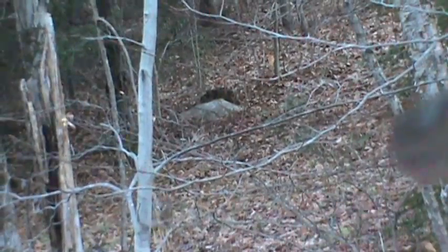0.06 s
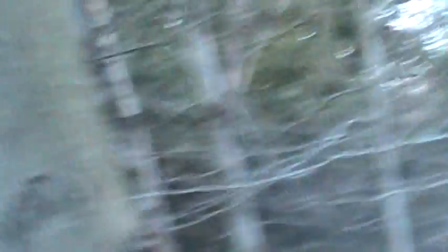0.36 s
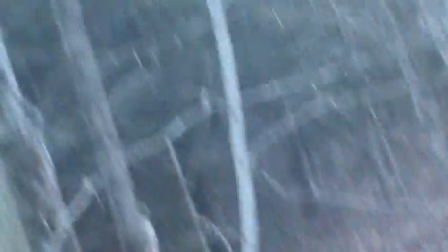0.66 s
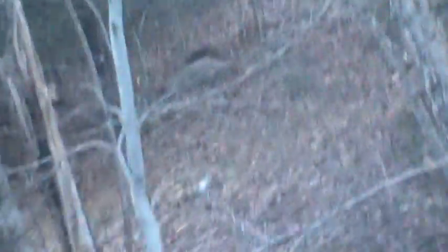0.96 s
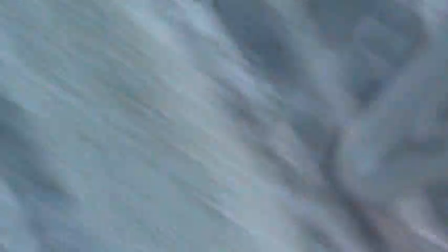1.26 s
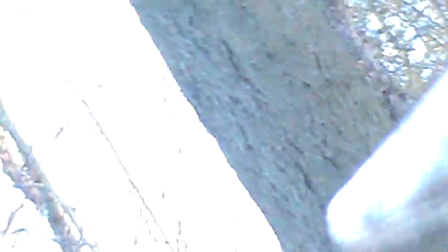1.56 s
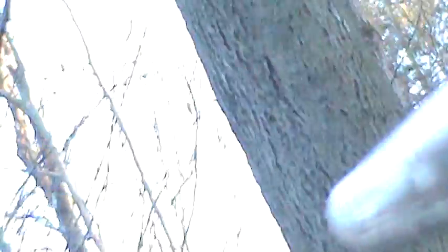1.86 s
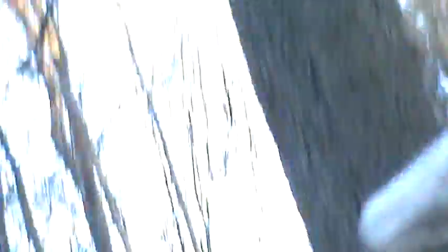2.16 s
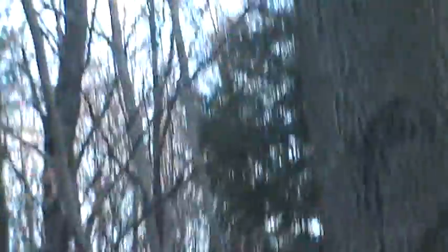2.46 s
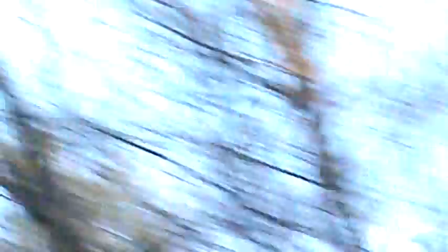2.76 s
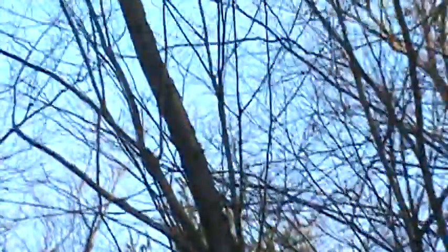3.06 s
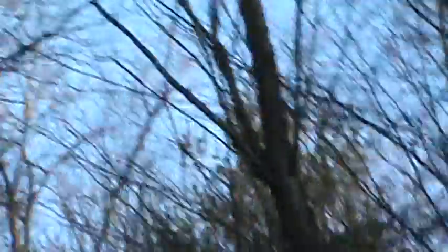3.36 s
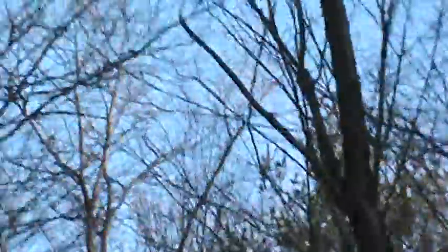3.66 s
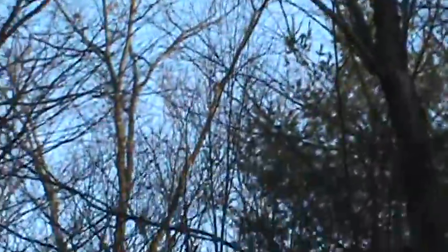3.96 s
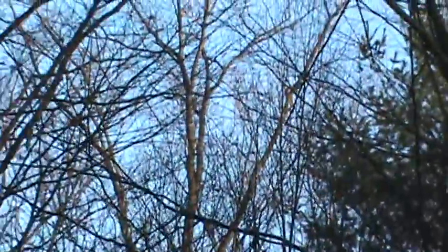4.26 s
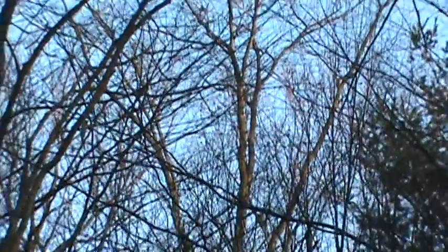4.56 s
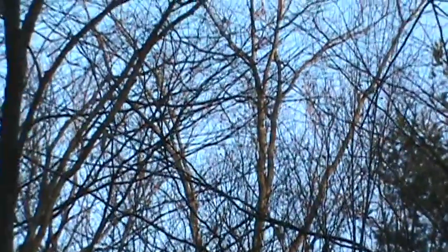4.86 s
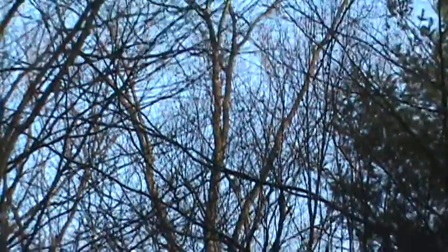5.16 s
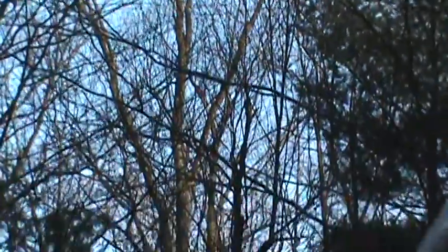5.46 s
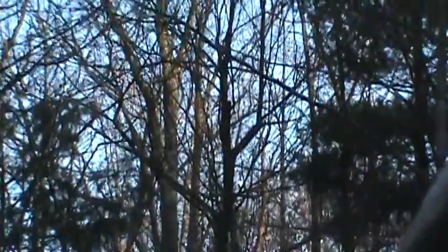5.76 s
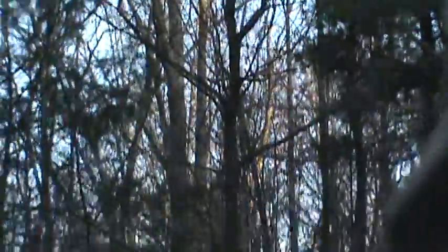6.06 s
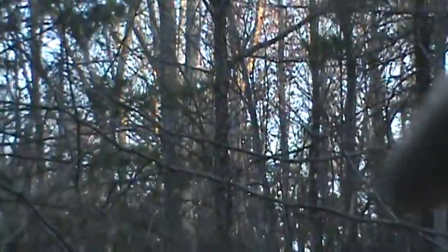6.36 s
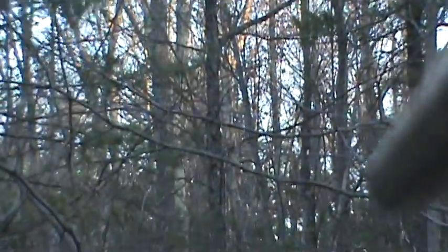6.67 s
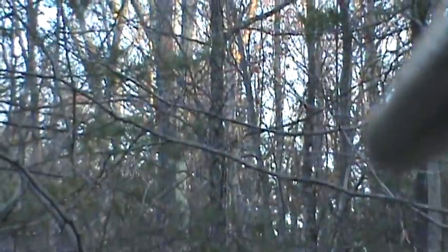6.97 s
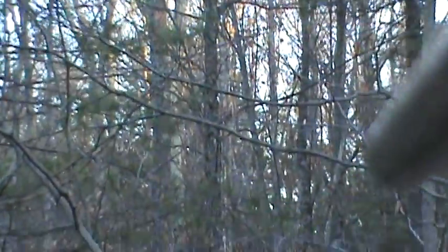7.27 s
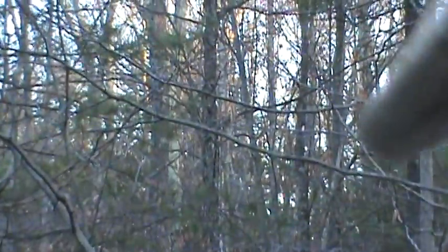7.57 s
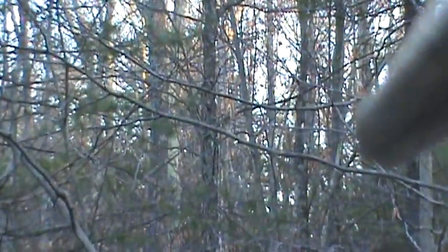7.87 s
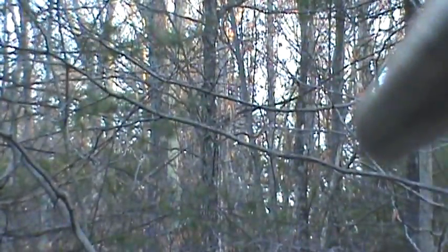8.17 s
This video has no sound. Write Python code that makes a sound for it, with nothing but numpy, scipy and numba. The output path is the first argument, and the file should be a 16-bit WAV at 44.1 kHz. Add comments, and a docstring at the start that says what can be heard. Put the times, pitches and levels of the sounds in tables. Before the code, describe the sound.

In quiet woodland, one close gunshot cracks out at the very start, slightly distorted, and the trees throw back a long, darkening echo. As it dies away, the camera is handled right at the microphone: irregular snaps of its plastic case, rubbing with a low rumble, then light taps. Only a faint outdoor murmur and hiss remain at the end.

```python
"""A tiny tick from a rifle's action, then one loud shot beside a camera in bare woodland.
The blast overloads the microphone, nearby leaves and trunks throw it back, and the echo rolls away,
ever duller, while a limiter (an automatic volume control) lets the level back up. Then hands shift on
the camera: its plastic case snaps, knocks and rubs over a quiet forest and a faint hiss."""
import sys
import numpy as np
from scipy import signal
from scipy.fft import rfft, irfft
from scipy.io import wavfile
from scipy.ndimage import uniform_filter1d
from numba import njit

SR = 44100
rng = np.random.default_rng(int(sys.argv[2]) if len(sys.argv) > 2 else 0)


def persist_wave(psi):
    """Save psi, clipped to +-1, as 16-bit WAV."""
    counts = np.round(np.clip(psi, -1, 1) * 32767).astype(np.int16)
    wavfile.write(sys.argv[1], SR, np.atleast_2d(counts).T)


N = 362898
TIME = np.arange(N) / SR
SHOT_S = .1168


def undb(db):
    """Turn decibels into a plain multiplier."""
    return 10 ** (np.asarray(db) / 20)


def unit(x):
    """Scale a signal to an average (rms) level of 1."""
    return x / np.sqrt(np.mean(x ** 2) + 1e-30)


def swell(rows, start):
    """Loudness curve through (t/s, level/dB) points counted from start, silent outside them."""
    s, db = np.transpose(rows)
    return undb(np.interp(TIME - start, s, db, left=-200, right=-200))


def gesture(start, hold, db, rise_db_per_s, fade_db_per_s):
    """Power of a sound that rises until start, holds and then fades."""
    drop_db = np.maximum(rise_db_per_s * (start - TIME), fade_db_per_s * (TIME - start - hold))
    return 10 ** ((db - np.clip(drop_db, 0, 120)) / 10)


def flicker(depth_db, smooth_samples, size=N):
    """A loudness that wobbles at random; more smoothing makes it slower."""
    return undb(depth_db * unit(uniform_filter1d(rng.standard_normal(size), smooth_samples)))


def colour(rows, hz):
    """How strong each frequency is, read from (f/Hz, level/dB) points."""
    at, db = np.transpose(rows)
    return undb(np.interp(np.log(hz + 1), np.log(at), db))


def noise(side_db, size=N):
    """Stereo white noise: a part both channels share (mid) and a weaker opposed part (side)."""
    mid, side = rng.standard_normal((2, size))
    return unit(mid + undb(side_db) * side * np.array([[1], [-1]]))


def tinted(rows, side_db, bass_side_db=-9, bass_hz=35, wide_hz=110):
    """Stereo noise with a given tone colour; the bass has its own stereo width."""
    hz = np.fft.rfftfreq(N, 1 / SR)
    mid, side = rfft(rng.standard_normal((2, N)))
    side = side * colour([(bass_hz, bass_side_db), (wide_hz, side_db)], hz)
    return unit(irfft(np.array([mid + side, mid - side]) * colour(rows, hz), N))


def resonance(hz, centre, width):
    """How strongly one ringing tone answers each frequency: 1 at its centre."""
    return hz * width / (hz * width + 1j * (hz ** 2 - centre ** 2))


def hit_level(x, db):
    """Give each channel of a short sound the energy of 10 ms at this level."""
    return x * undb(db) / np.sqrt(np.sum(x ** 2, axis=-1, keepdims=True) / (.01 * SR))


def add(out, s, sound, pan_db=0):
    """Mix a short sound in at time s; pan_db is left minus right."""
    i = int(s * SR)
    out[:, i:i + sound.shape[-1]] += (sound * undb(np.array([[pan_db], [-pan_db]]) / 2))[:, :N - i]


# tone colour of the quiet forest and the microphone's hiss: f/Hz, level/dB
FOREST_COLOUR = [(20, -23.5), (50, -9), (110, -5), (330, -3), (480, -7), (800, -10.5), (1300, -19.5),
                 (2200, -24.5), (5000, -27.5), (15500, -29.5)]
# the camera's faint high tones: f/Hz, level/dB
WHINE_TONES = [(6218, -80.5), (15735, -74.5)]
def background(forest_db=-51):
    """The woods murmur far away, with a little hiss and the camera's thin whine."""
    whine = sum(undb(db) * np.sqrt(2) * np.sin(2 * np.pi * hz * TIME) for hz, db in WHINE_TONES)
    forest = tinted(FOREST_COLOUR, side_db=-3.5, bass_side_db=-22, bass_hz=250, wide_hz=900)
    return forest * undb(forest_db) + whine


# the tones at which the camera case rings: f/Hz, width/Hz, level/dB
CASE_TONES = [(560, 220, -1), (740, 150, 1.5), (942, 95, 4), (1290, 280, -3.5), (1995, 430, -3.5),
              (3163, 160, -4.5), (3780, 670, -6), (5640, 480, -11.5), (6204, 690, -6), (8400, 900, -18.5),
              (9240, 2100, -18.5), (10100, 1200, -22), (10800, 300, -18)]
def case(push, stretch=1, airborne_db=-8):
    """The plastic case rings, retuned a little by the grip; some sound comes straight through the air."""
    hz = np.fft.rfftfreq(push.shape[-1], 1 / SR)
    response = sum(undb(db) * resonance(hz, f * stretch, width) for f, width, db in CASE_TONES)
    return irfft(rfft(push) * (response + undb(airborne_db)), push.shape[-1])


# moves of the hand on the camera: t/s, length/s, scrape level/dB, rumble level/dB
HAND_MOVES = [(1.154, 0.042, -66, -38.5), (1.248, 0.076, -33, -61), (1.48, 0.93, -49.5, -70),
              (2.201, 0.082, -33.5, -52), (2.285, 0.26, -39, -52), (2.622, 0.026, -35.5, -52),
              (2.69, 0.41, -47.5, -46.5), (2.8, 0.089, -37, -40.5), (3.312, 0.24, -38.5, -39.5),
              (3.413, 0.067, -29.5, -32.5), (3.722, 0.066, -54, -44), (3.943, 0.055, -45, -47),
              (5.707, 0.62, -62, -75), (5.989, 0.073, -46, -57.5), (6.546, 1, -71, -75),
              (7.05, .05, -70, -51.5), (7.687, 0.021, -72, -56)]
def hand_motion():
    """How loudly the hand scrapes, and how loudly the camera body rumbles, at each moment."""
    scrape_power = sum(gesture(s, length, db, 548, 518) for s, length, db, _ in HAND_MOVES)
    rumble_power = sum(gesture(s, length, db, 178, 144) for s, length, _, db in HAND_MOVES)
    return np.sqrt(scrape_power), np.sqrt(rumble_power)


# tone colours of the scrape and of the grip's rumble: f/Hz, level/dB
SCRAPE_COLOUR = [(150, -10), (300, -8), (700, 13), (1400, 1.5), (2300, 5.5), (4000, 3.5), (6000, -3),
                 (10000, -2.5), (12500, -9.5), (15500, -21)]
RUMBLE_COLOUR = [(20, -9), (50, -5), (90, 5), (135, 6), (250, 0), (450, -7), (700, -3.5), (1000, -10.5),
                 (2500, -55)]
def rubbing(scrape_gain, rumble_gain, case_db=-5, catches_per_s=75, catch_s=0.0011):
    """Skin and cloth scrape in jerks and set the case ringing; the moving grip rumbles below."""
    grains, jerks = flicker(3, 24), flicker(2, 300)
    # now and then a fibre catches, lets go at once and quickly settles
    slips = (rng.random(N) < catches_per_s / SR) * rng.random(N) ** 2 * 2
    catches = undb(12) * signal.lfilter([1], [1, -np.exp(-1 / (catch_s * SR))], slips)
    hiss = tinted(SCRAPE_COLOUR, side_db=-2.5, bass_side_db=-1, bass_hz=1500, wide_hz=8000)
    scrape = unit(hiss * (grains * jerks + catches))
    friction = unit(scrape + undb(case_db) * unit(case(scrape)))
    rumble = tinted(RUMBLE_COLOUR, side_db=-1.5, bass_side_db=-14.5, bass_hz=140, wide_hz=500)
    return friction * scrape_gain + rumble * rumble_gain


# soft finger knocks on the case: t/s, ring level/dB, f/Hz, tick level compared with the ring/dB
FINGER_KNOCKS = [(3.817, -33, 910, -11), (4.2561, -44.5, 815, -5.5), (4.3627, -44.5, 826, -0.5),
                 (4.537, -44.5, 870, 2.5), (5.6583, -39.5, 800, 0), (5.696, -37.5, 800, -6.5),
                 (5.7366, -36, 790, -5), (5.8649, -38.5, 738, -19), (5.9686, -38, 760, -14),
                 (5.9985, -34.5, 774, -8), (6.103, -41.5, 720, -4), (6.2418, -43, 637, -20),
                 (6.572, -42.5, 740, -9), (6.642, -41, 665, -9.5), (6.7327, -40, 720, -14),
                 (6.8003, -49.5, 700, 1), (6.8414, -42, 660, -22), (7.0796, -39, 696, -11),
                 (7.1202, -31.5, 686, -20), (7.1626, -36, 690, -11), (7.7043, -56, 660, -2)]
def knocks(rise_s=0.00087, ring_s=0.0023, right_lag_s=0.00036, fingertip_hz=3000):
    """A fingertip pushes slowly, so mostly one low tone rings; it reaches the left channel first."""
    out = np.zeros((2, N))
    t = np.maximum(TIME[:2048] - np.array([[0], [right_lag_s]]), 0)
    shape = (1 - np.exp(-t / rise_s)) ** 2 * np.exp(-t / ring_s)
    soften = signal.butter(1, fingertip_hz, fs=SR, output="sos")
    for s, db, hz, tick_db in FINGER_KNOCKS:
        ring = shape * np.sin(2 * np.pi * hz * t)
        tick = signal.sosfilt(soften, case(noise(-2.5, size=2048) * shape))
        add(out, s, hit_level(ring, db) + hit_level(tick, db + tick_db))
    return out


# clicks that set a small hard part ringing: t/s, level/dB, f/Hz
LOOSE_PART_PINGS = [(1.5327, -32.5, 4080), (6.016, -34.5, 3600), (7.1515, -32.5, 3720)]
def pings(ring_s=0.0017, right_lag_s=.00005, split=0.1):
    """A small loose part of the case rings briefly with two tones close together."""
    out = np.zeros((2, N))
    t = np.maximum(TIME[:2048] - np.array([[0], [right_lag_s]]), 0)
    for s, db, hz in LOOSE_PART_PINGS:
        phase = 2 * np.pi * hz * t
        pair = np.sin(phase * (1 + split / 2)) - np.sin(phase * (1 - split / 2))
        add(out, s, hit_level(pair * np.exp(-t / ring_s), db))
    return out


def creaks(scrape_gain, growth=.62, scatter_db=3, tilt_db=4, tries=120):
    """The case gives faint clicks at random times, louder when the hand scrapes harder."""
    rows = []
    for s, (strength, tilt) in zip(rng.random(tries) * TIME[-1], rng.standard_normal((tries, 2))):
        scrape_db = 20 * np.log10(scrape_gain[int(s * SR)])
        db = -20 + growth * scrape_db + scatter_db * strength
        if db > -66:  # skip the faintest
            rows.append((s, db, -3 - tilt_db * tilt, -2 + tilt_db * tilt))
    return snaps(rows)


# sharp clicks, first of the rifle's action, then of the camera case:
# t/s, middle band level/dB, low band compared with it/dB, top band compared with it/dB
SHARP_CLICKS = [(.0924, -47, -29, 3), (.096, -54, -25, 1), (.6306, -37.5, -3, 7), (.7439, -17.5, -9, -4),
                (.7816, -19.5, -4, -8), (1.0661, -33.5, -9, -3), (1.1151, -31, -13, -4),
                (1.138, -29.5, 8, -13), (1.1624, -27.5, -15, -6.5), (1.1701, -28.5, -3, -5),
                (1.1806, -27.5, -15, -12), (1.2268, -35.5, -6, -1.5), (1.2878, -26.5, -6.5, -4.5),
                (1.3202, -26, -8, -4), (1.3321, -35, -4.5, -2.5), (1.4049, -37.5, -7, -12),
                (1.5327, -27, -9, -11), (1.6143, -32.5, -7, -8), (1.6726, -27.5, -3, -7),
                (1.768, -29, -3.5, -3), (1.8996, -28, -3.5, 1), (1.9587, -36.5, -8, -5),
                (2.0028, -28.5, -1.5, -3.5), (2.0444, -36.5, -7, -6), (2.0745, -37, 3, -8),
                (2.2027, -24, -2.5, -1.5), (2.2442, -44, 1, 15), (2.2674, -30, -12, 0),
                (2.3817, -37, 3, -3), (2.5178, -41, -7, -1), (2.8098, -23.5, -14, -14),
                (2.8141, -26.5, -3, -6), (2.8407, -32.5, -2, -2), (2.9858, -40.5, 1, 1),
                (3.0392, -34, -3, -5), (3.0708, -31.5, -3.5, -6), (3.1418, -37, 1, -4.5),
                (3.2674, -28.5, -7, -9), (3.3092, -27, -7.5, -8), (3.4912, -23, -7, -8.5),
                (3.6183, -37, 7, -12), (3.6224, -25.5, -0.5, -7), (3.7345, -42, 2, -8),
                (3.7406, -27, 0.5, -8.5), (3.7926, -33, 6.5, -9), (3.951, -25, -0.5, -2.5),
                (3.971, -35, -9.5, -7), (3.9982, -36, -4, 5), (4.0065, -27.5, 2, -10),
                (4.0288, -35.5, 2, 0.5), (4.449, -56.5, -8, 3), (4.576, -29, 3.5, -1),
                (4.6065, -33.5, 4.5, -11), (5.0893, -24.5, -0.5, -2), (5.3417, -40.5, -9, -7),
                (5.3876, -22.5, 0.5, -1.5), (5.4355, -37.5, 4.5, -7), (5.6109, -34, -2.5, -3),
                (5.6269, -33.5, 7, -1), (5.793, -40.5, 1, -4), (5.8729, -44.5, -16, -5.5),
                (6.0156, -37.5, -1, 1), (6.1324, -44, 1.5, -5), (6.2702, -55, 5, 0),
                (6.897, -65, -12.5, 17), (7.1515, -39.5, -14, 6)]
def snaps(rows, rise_s=0.0011, slip_s=0.0017, rattle_s=0.012, spot_hz=3400):
    """Each click is a brief slip of two hard surfaces and a weak rattle, heard through the case."""
    out, t = np.zeros((2, N)), TIME[:2048]
    hz = np.fft.rfftfreq(len(t), 1 / SR)
    rattle = undb(-19) * np.exp(-t / rattle_s)
    contact = np.minimum(t / rise_s, 1) ** 2 * (np.exp(-np.maximum(t - rise_s, 0) / slip_s) + rattle)
    bands = [signal.butter(2, edges_hz, "band", fs=SR, output="sos")
             for edges_hz in ((320, 1360), (1900, 5900), (6800, 12300))]
    for s, db, low_db, top_db in rows:
        grip, place, across = rng.standard_normal(3)
        # the surfaces catch and let go several times within one click
        slip = contact * flicker(4, 30, len(t))
        # each touched spot rings at a slightly different pitch
        spot = 1 + undb(1) * resonance(hz, spot_hz * np.exp(0.13 * place), width=800)
        for band, share_db, side_db in zip(bands, (low_db, 0, top_db), (-2.5, -2.5, -6)):
            ring = case(noise(side_db, len(t)) * slip, stretch=1 + 0.05 * grip)
            click = signal.sosfilt(band, irfft(rfft(ring) * spot))
            add(out, s, hit_level(click, db + share_db), pan_db=-1 + 1.65 * across)
    return out


def travel_loss_db(hz, travel_s, air_db_per_s_hz=0.0066, brush_db_per_s=7.9, brush_hz=300):
    """Air and undergrowth soak up the treble along the way; the low roll builds up a little late."""
    loss_db_per_s = air_db_per_s_hz * hz + brush_db_per_s * hz ** 2 / (hz ** 2 + brush_hz ** 2)
    late_lows_db = np.outer(1 / (1 + (hz / 600) ** 2), np.exp(-travel_s / .22))
    return np.outer(loss_db_per_s, travel_s) + late_lows_db


# tone colour of the echo before the air dulls it: f/Hz, level/dB
FRESH_ECHO_COLOUR = [(25, -44), (50, -39), (90, -38), (130, -25.5), (190, -7.5), (280, -0.5), (420, 1),
                     (650, 0.5), (1000, -3), (2000, -5), (4000, -10), (8000, -12.5), (15500, -12.5)]
# echoes of close trunks, the facing slope, the woods beyond and the last far roll:
# level/dB, hold/s, fade/(dB per s)
ECHO_LAYERS = [(-4, 0.014, 109), (-6.5, 0.708, 83), (-11.5, .05, 10), (-47, 1, 2)]
def echo(delay_s=.015, rise_db_per_s=3702.5, patchy_db=1.0):
    """Countless trunks return the shot; the longer the path, the more treble the air has taken."""
    hz, s, (mid, side) = signal.stft(rng.standard_normal((2, N)), SR, nperseg=2048)
    travel_s = np.maximum(s - SHOT_S, 0)
    tone = colour(FRESH_ECHO_COLOUR, hz)[:, None] * undb(-travel_loss_db(hz, travel_s))
    tone /= np.sqrt(np.mean(tone ** 2, axis=0))  # keep only the colour: the layers set the loudness
    # stands of trees answer in clumps, each with its own colour
    clumps = uniform_filter1d(rng.standard_normal(tone.shape), size=2, axis=1)
    clumps = uniform_filter1d(clumps, size=10, axis=0)
    tone *= undb(patchy_db * unit(clumps))
    # high sounds differ more between left and right
    width = colour([(200, -11), (2000, -6)], hz)[:, None]
    stereo = np.array([mid + width * side, mid - width * side]) / np.sqrt(1 + width ** 2)
    power = sum(gesture(SHOT_S + delay_s, hold, db, rise_db_per_s, fade) for db, hold, fade in ECHO_LAYERS)
    return signal.istft(stereo * tone, SR)[1][:, :N] * np.sqrt(power)


# loudness of the crack, the low thump and the splash off the leaves: t/s after the shot, level/dB
CRACK_SHAPE = [(-.002, -41.5), (0, -17), (.0012, -3), (.0085, -5.5), (.0105, -17), (.02, -57)]
THUMP_SHAPE = [(.007, -27), (.0105, -1.5), (.018, 3), (.028, -14.5), (.06, -23), (.2, -32), (.7, -36.5),
               (.9, -57)]
SPLASH_SHAPE = [(.008, -1), (.028, -13), (.036, -3), (.06, -4), (.09, -13.5), (.13, -27.5), (.25, -21.5)]
# tone colours of the same three: f/Hz, level/dB
CRACK_TONE = [(60, -9.5), (300, -15.5), (1000, -3.5), (3500, 1), (6000, -4), (11000, 6), (15500, -14.5)]
THUMP_TONE = [(20, -29), (45, -22.5), (72, -0.5), (120, -3.5), (200, 0.5), (300, -2), (900, -17.5),
              (2000, -16), (6000, -33)]
SPLASH_TONE = [(200, -11), (1000, -5.5), (2000, -3.5), (5000, -3.5), (10000, -0.5), (12500, -9),
               (15500, -6)]
def blast(gas_hz=76, gas_db=-2, gas_delay_s=0.0075):
    """A hissing crack, the low push of the muzzle gas, then a bright splash off nearby leaves and twigs."""
    crack = tinted(CRACK_TONE, side_db=-8) * swell(CRACK_SHAPE, SHOT_S)
    # the pressure swings back and forth about once before it settles
    t = np.maximum(TIME - SHOT_S - gas_delay_s, 0)
    gas = -undb(gas_db) * np.sin(2 * np.pi * gas_hz * t) * np.exp(-t * gas_hz / 1.3)
    thump = tinted(THUMP_TONE, side_db=-7.5, bass_side_db=3.5) * swell(THUMP_SHAPE, SHOT_S)
    splash = tinted(SPLASH_TONE, side_db=-6.5) * swell(SPLASH_SHAPE, SHOT_S)
    return crack + gas + thump + splash


def scene():
    """The shot and its echo in the quiet woods, plus the rubs, knocks and clicks close by."""
    scrape_gain, rumble_gain = hand_motion()
    woods = blast() + echo() + background()
    handling = rubbing(scrape_gain, rumble_gain) + knocks() + pings()
    return woods + handling + snaps(SHARP_CLICKS) + creaks(scrape_gain)


@njit
def follow(x, attack, release):
    """Track a level, rising fast and sinking slowly."""
    out, level = np.empty(len(x)), 0.
    for i in range(len(x)):
        level += (x[i] - level) * (attack if x[i] > level else release)
        out[i] = level
    return out


def record(dry, hold_db=-13.0, most_cut_db=-8, attack_s=0.0051, release_s=0.05, top_hz=15900):
    """A limiter turns loud parts down, but only so far: the blast still overloads. The top is cut off."""
    loudness = follow(np.abs(dry).mean(axis=0), 1 / (attack_s * SR), 1 / (release_s * SR))
    held = dry * np.clip(undb(hold_db) / (loudness + 1e-9), undb(most_cut_db), 1)
    clipped = held / (1 + (held / .85) ** 4) ** .25  # rounds off the peaks
    return signal.sosfilt(signal.ellip(10, .2, 70, top_hz, fs=SR, output="sos"), clipped)


dry = scene()
out = record(dry)
persist_wave(out)
```